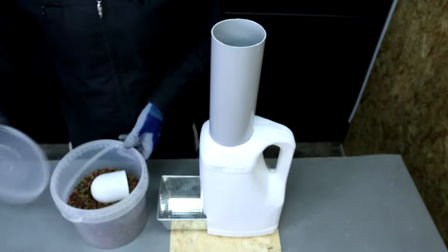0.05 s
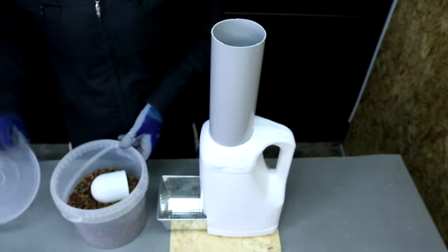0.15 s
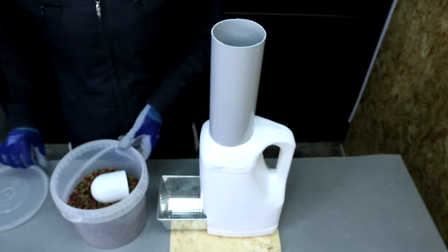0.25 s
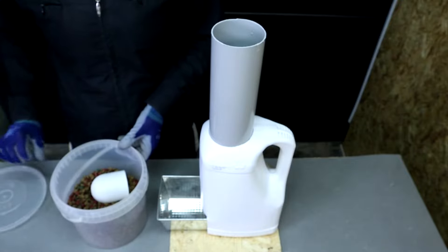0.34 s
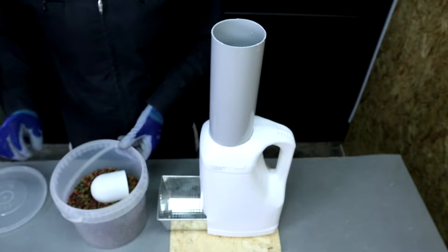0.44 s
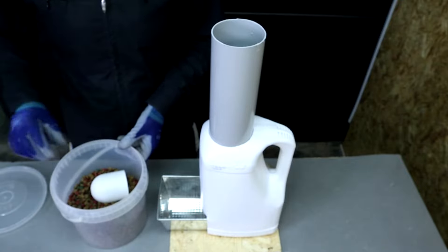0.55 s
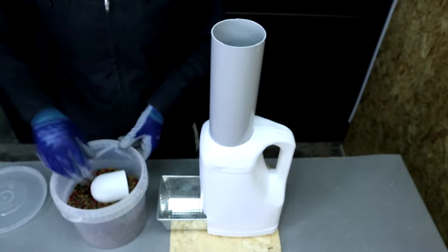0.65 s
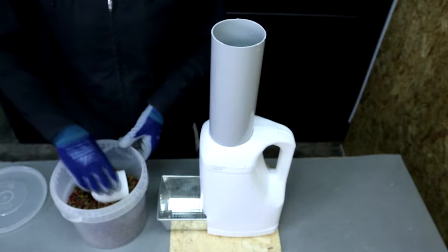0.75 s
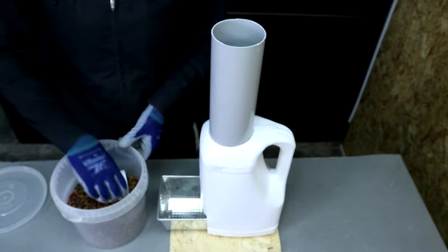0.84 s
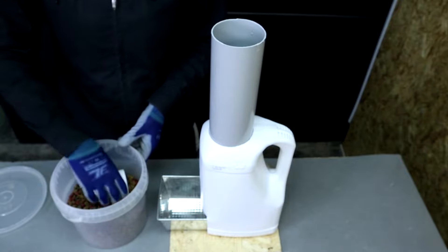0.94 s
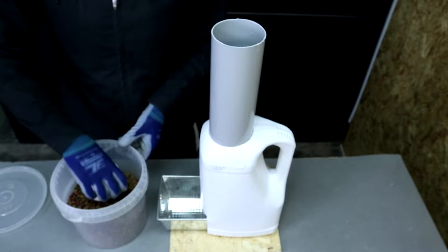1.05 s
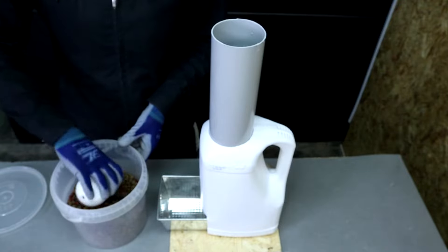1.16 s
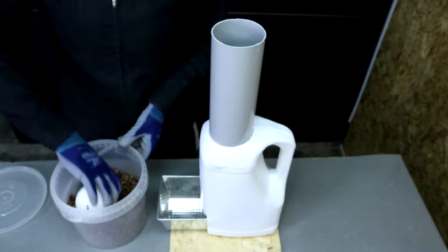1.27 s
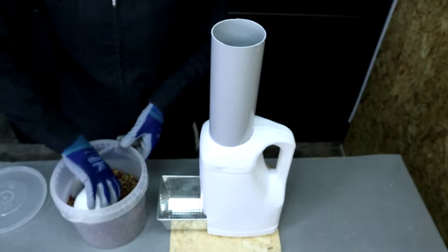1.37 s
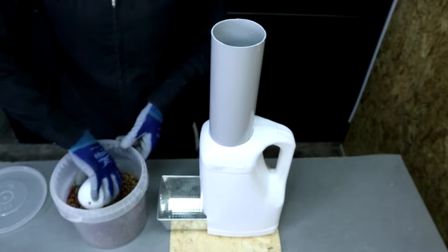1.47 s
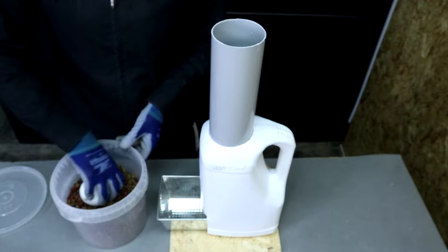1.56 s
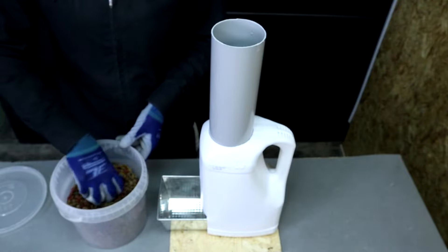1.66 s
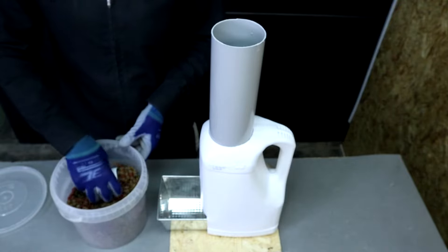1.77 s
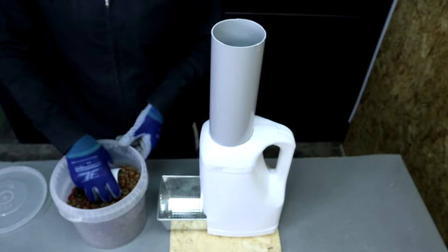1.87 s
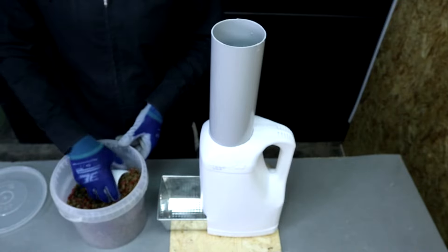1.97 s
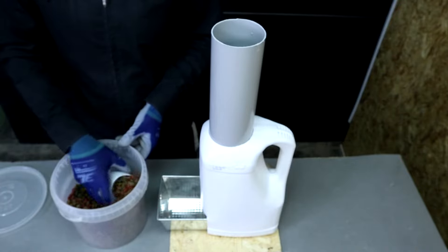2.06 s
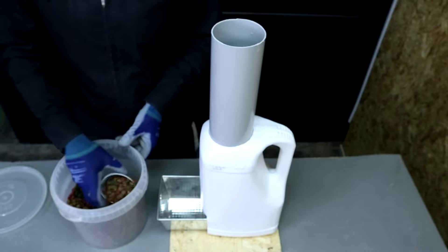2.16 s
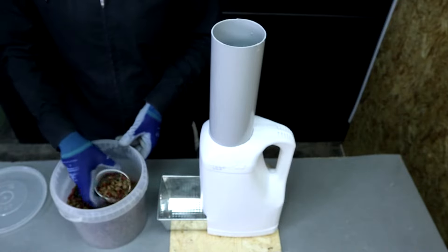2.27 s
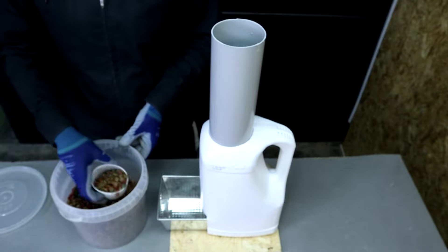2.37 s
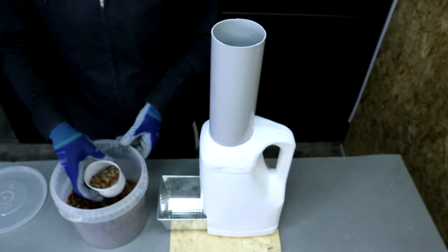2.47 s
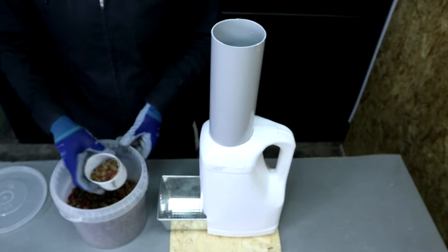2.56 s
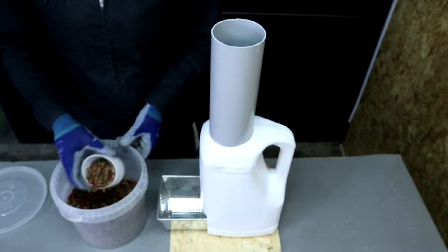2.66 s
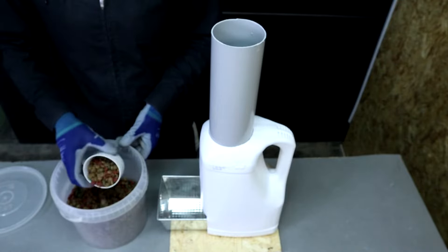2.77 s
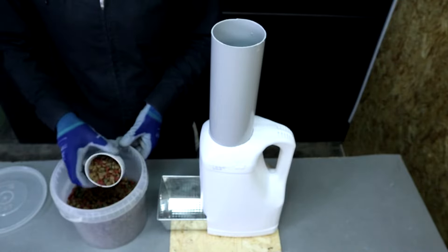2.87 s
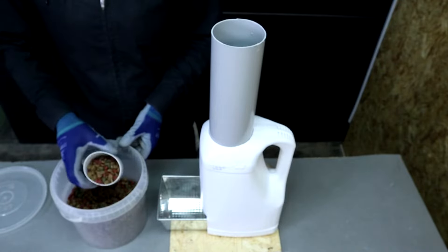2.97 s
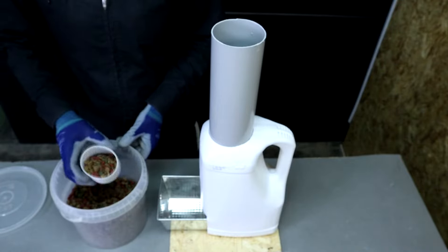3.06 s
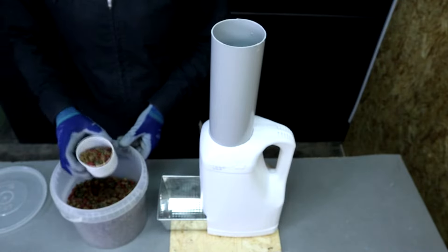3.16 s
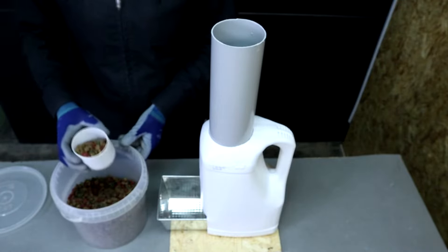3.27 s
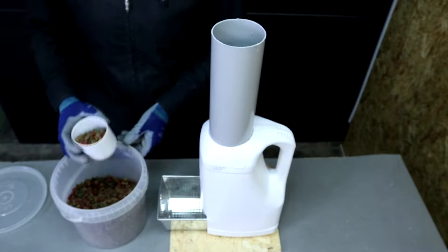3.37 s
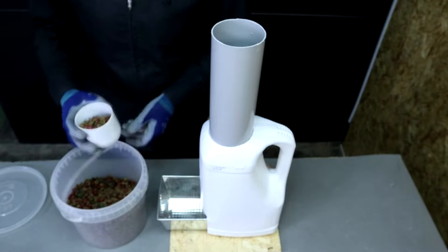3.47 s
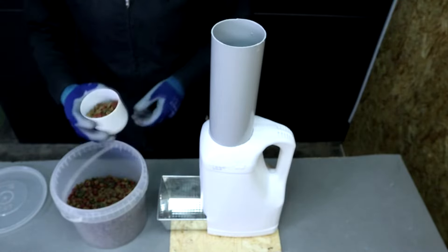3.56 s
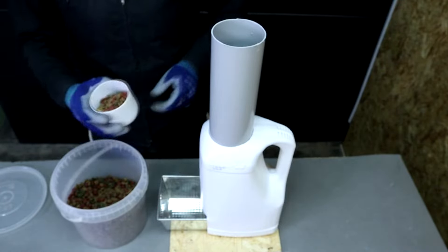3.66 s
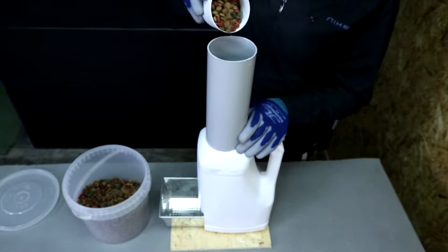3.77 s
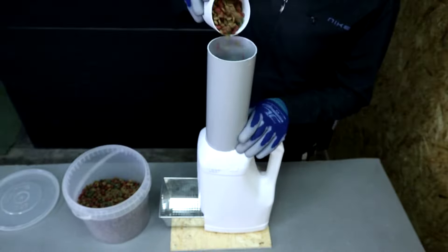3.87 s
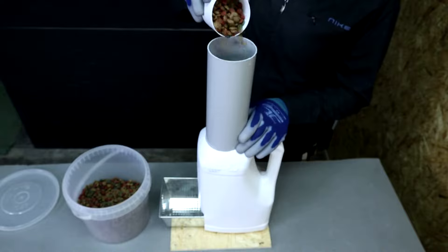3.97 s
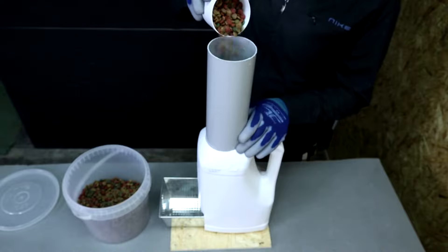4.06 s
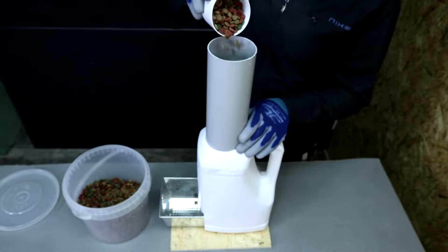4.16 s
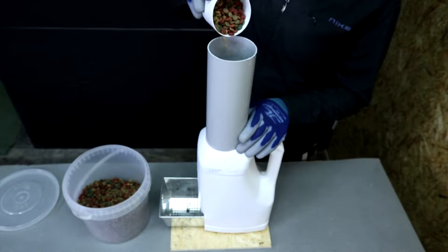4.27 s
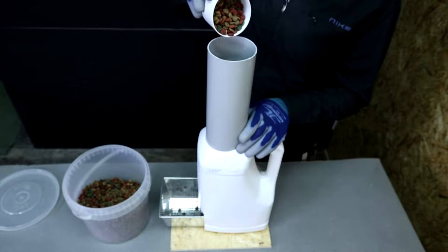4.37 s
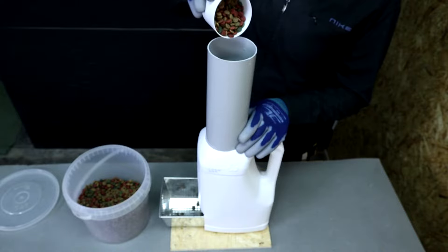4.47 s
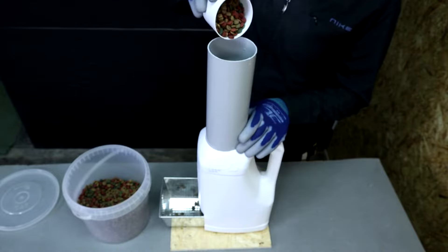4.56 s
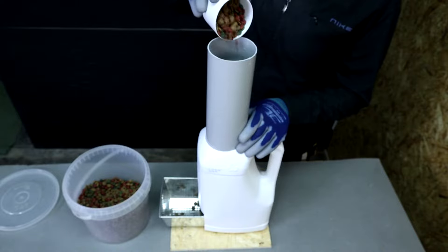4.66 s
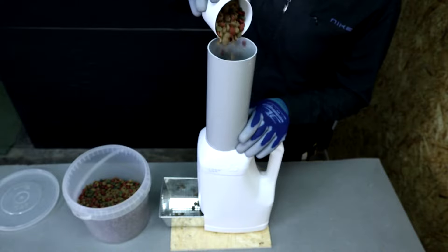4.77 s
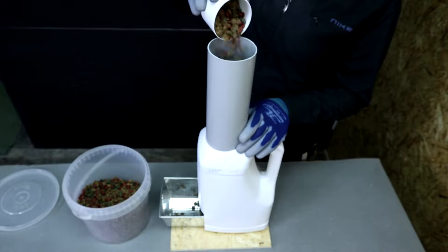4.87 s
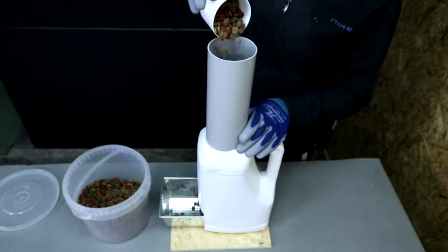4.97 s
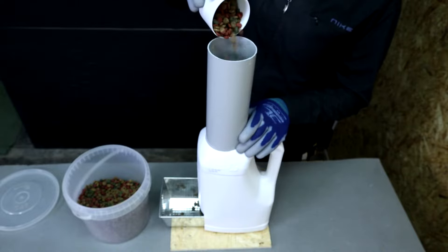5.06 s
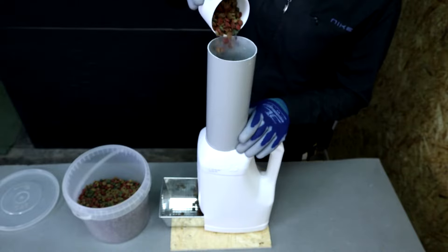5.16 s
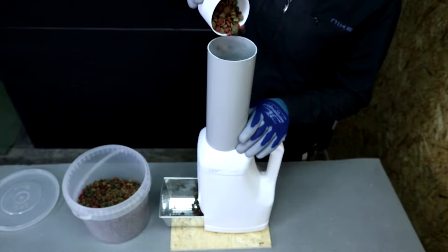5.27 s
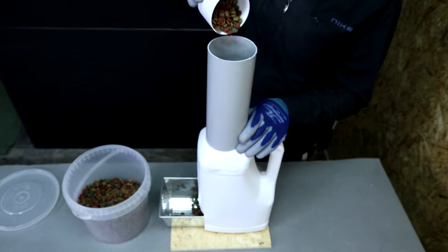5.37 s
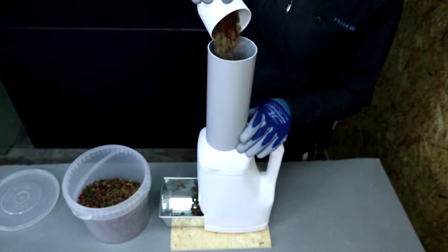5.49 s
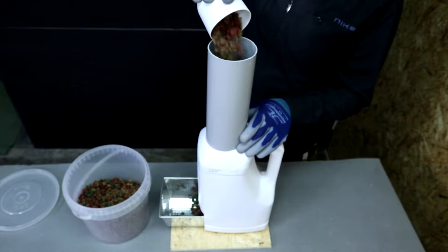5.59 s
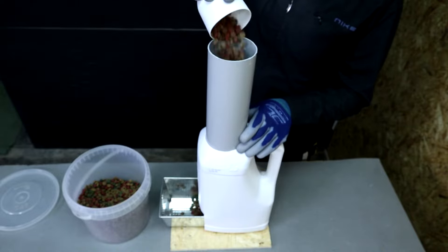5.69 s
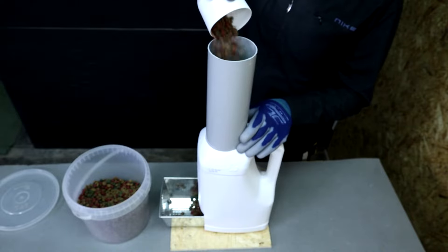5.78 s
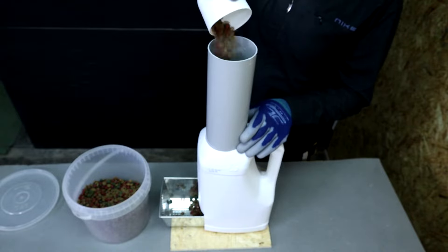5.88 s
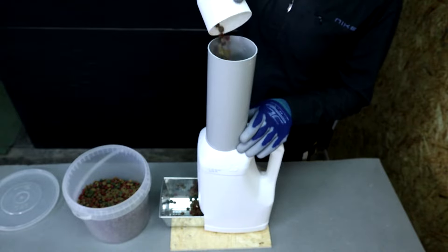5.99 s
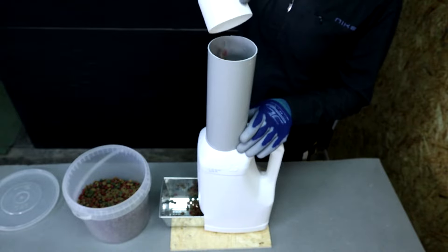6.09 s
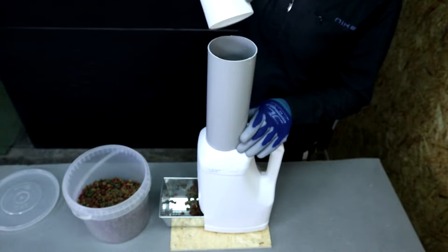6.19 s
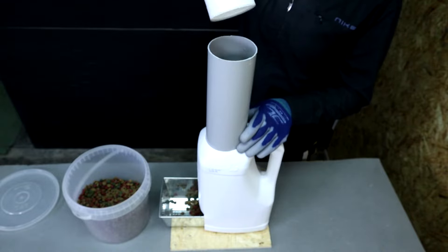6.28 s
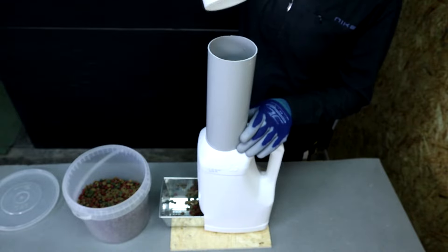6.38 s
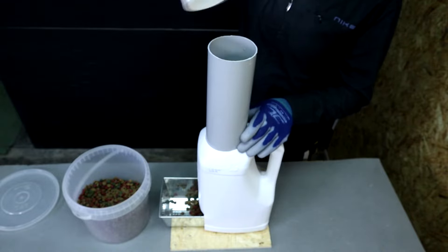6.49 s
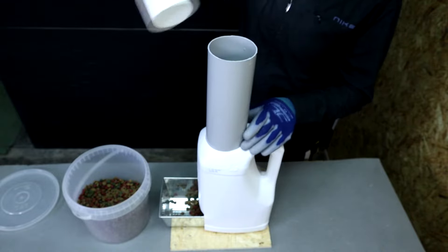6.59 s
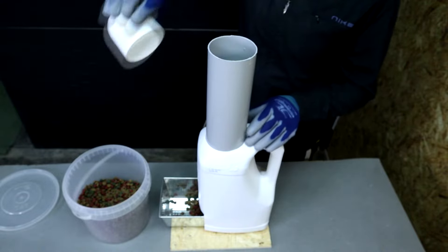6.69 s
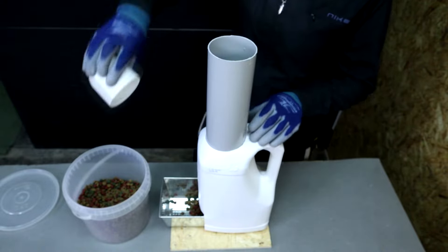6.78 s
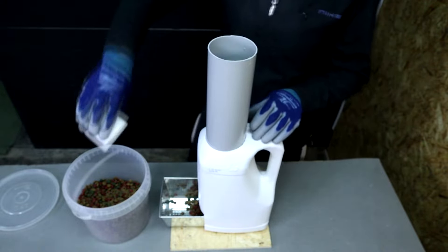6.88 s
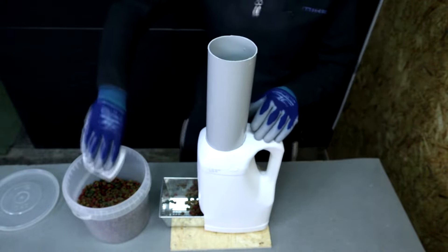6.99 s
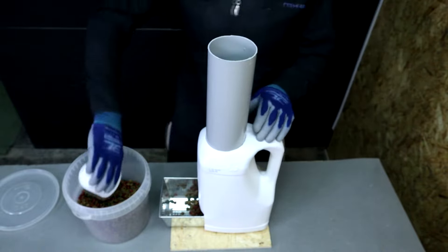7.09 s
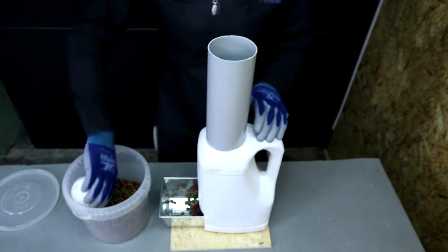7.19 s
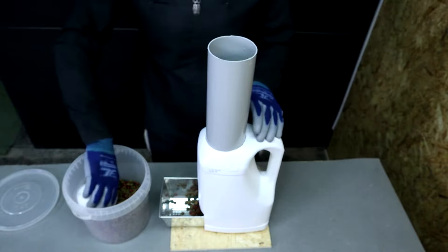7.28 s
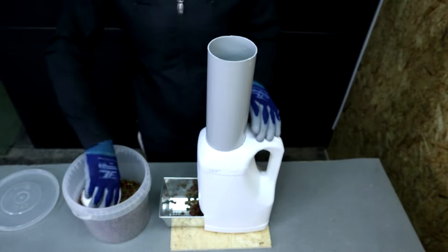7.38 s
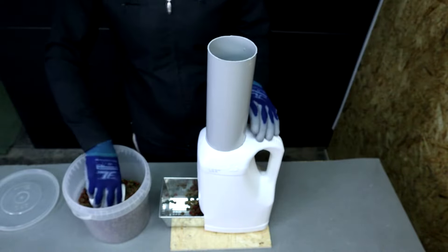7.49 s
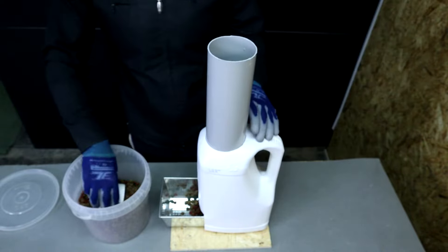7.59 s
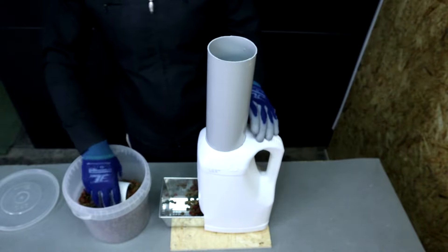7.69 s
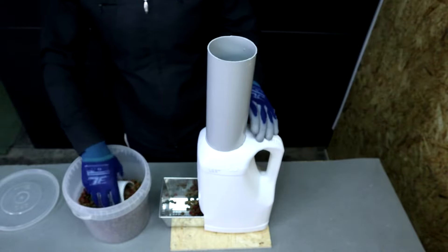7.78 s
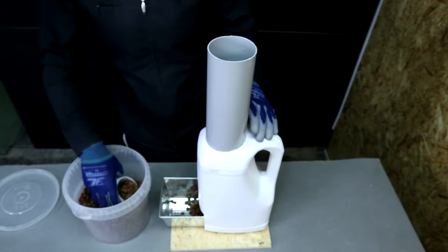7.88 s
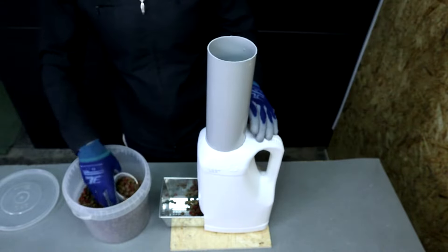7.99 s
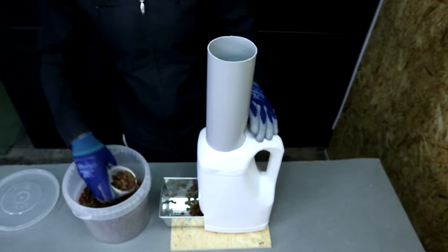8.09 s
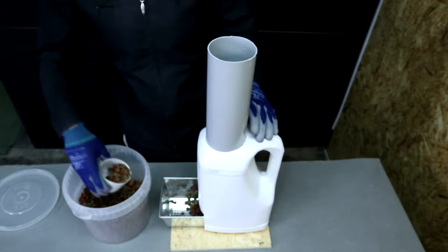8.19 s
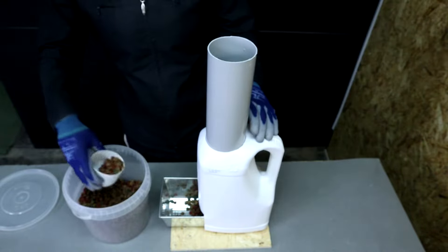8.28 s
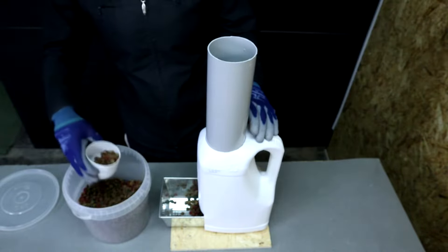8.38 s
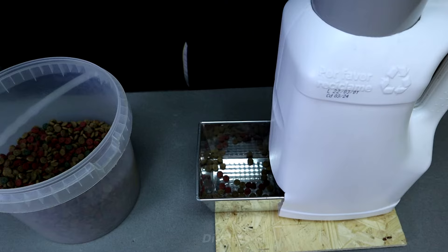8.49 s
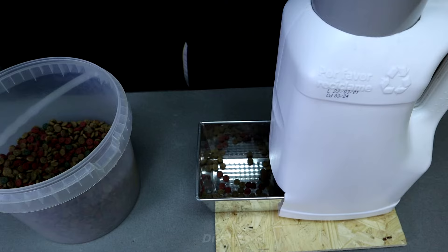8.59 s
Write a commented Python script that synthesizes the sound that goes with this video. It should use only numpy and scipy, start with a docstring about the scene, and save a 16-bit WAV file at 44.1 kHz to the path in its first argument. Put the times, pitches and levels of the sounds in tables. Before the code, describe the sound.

A plastic lid clatters down, a cup crunches through dry pellets in a tub, then loud rattling pours ring a hollow plastic jug over a deep hum.

```python
"""A deep hum fills a small room; a plastic lid knocks on a table, then a cup digs dry pellets out of a plastic
tub and pours them down a pipe into a hollow jug with a metal tray, then digs again; an engine throbs outside.
Pellets are random taps ringing a plastic body; hums are sine waves; cloth and air are shaped noise.
Echoes, and reflections that differ left and right, place the near sounds in front of two microphone ports."""
import sys
import numpy as np
from scipy import signal
from scipy.fft import rfft, irfft, next_fast_len
from scipy.io import wavfile
from scipy.ndimage import uniform_filter1d

SR = 44100
rng = np.random.default_rng(int(sys.argv[2]) if len(sys.argv) > 2 else 0)


def waveform_to_disk(signal):
    """Save audio, clipped to [-1, 1], as 16-bit WAV at the path in sys.argv[1]."""
    frames = np.transpose(np.atleast_2d(signal))
    scaled = np.clip(frames, -1, 1) * 32767
    samples = np.round(scaled).astype(np.int16)
    wavfile.write(sys.argv[1], SR, samples)


N = 381024
T = np.arange(N) / SR
HUM_HZ = 40.6

# Deep hum through the walls. Each row: time in seconds, level in dB before the dips.
HUM = [(0, -43), (1.0, -40.5), (1.8, -38), (3.72, -36.5), (4.06, -45), (5.52, -44), (6.1, -41), (6.4, -48)]
# Engine outside. Each row: time in seconds, firings a second, level in dB.
ENGINE = [(5.6, 11, -47), (6.3, 10.7, -49.5), (6.8, 12.1, -42), (7.05, 13.0, -35.5), (7.3, 13.5, -30),
          (7.65, 13.3, -29), (8.05, 13.3, -27), (8.25, 13.7, -29.5), (8.499, 14.1, -27.5)]
# Tone colour of the plastic tub. Each row: pitch in Hz, level in dB.
TUB = [(50, -7), (200, -17), (400, -10), (1100, -12), (2000, -28.5), (5000, -46)]
# Notes the tub rings at. Each row: pitch in Hz, width in Hz, strength in dB over the colour.
TUB_RINGS = [(150.5, 25, 7.8), (251, 18, 10.5), (349, 36, 12), (406, 30, 19.5), (530, 11, 3.9),
             (637, 11, 10), (796, 140, 6.1), (998, 69, 15.7)]
# Flow of pellets down the pipe, one table a pour. Each row: time in seconds, rattle level in dB.
POURS = [
    [(4.115, -25), (4.25, -24.5), (4.435, -22.5), (4.5, -18.5), (4.645, -23), (4.915, -43), (4.98, -35)],
    [(5.02, -16), (5.135, -17), (5.265, -23.5), (5.475, -20), (5.505, -30)],
    [(5.59, -23.5), (5.645, -31), (5.685, -15), (5.8, -19), (6.03, -31.5), (6.25, -33), (6.365, -39.5),
     (6.5, -57)],
    [(8.51, -44), (8.56, -30), (8.595, -24), (8.64, -32)],
]
# Tone colour of the jug. Each row: pitch in Hz, level in dB.
JUG = [(290, -67), (520, -17), (609, -7), (1060, -8), (1550, -7.5), (3410, -7.5), (11200, -13.5),
       (14600, -30.5)]
# Notes the jug rings at. Each row: pitch in Hz, width in Hz, strength in dB over the colour.
JUG_RINGS = [(608, 50, 5.5), (767, 120, 3), (945, 34, 6), (1302, 64, 9), (1565, 76, 11), (1866, 140, 6.5),
             (2170, 135, 7), (2730, 39, 7), (3200, 220, 4), (3430, 69, 9.5), (3670, 71, 5.5),
             (4100, 350, 2.5), (5150, 260, 2.5), (6730, 73, 2)]


def gain_of(db):
    """Turns decibels into an amplitude factor."""
    return 10 ** (np.asarray(db) / 20)


def evened(x):
    """Scales a signal to an average (RMS) strength of 1."""
    return x / np.sqrt(np.mean(x ** 2) + 1e-20)


def read(points, hz):
    """Reads a (Hz, value) table at any pitch, along a logarithmic pitch axis."""
    f, value = np.transpose(points)
    return np.interp(np.log(hz + 1), np.log(f + 1), value)


def track(tables, column, silent=-120.):
    """One column of one or several tables along time, held at the silent value outside them."""
    out = np.full(N, silent)
    several = np.ndim(tables[0]) == 2
    for rows in tables if several else [tables]:
        rows = np.array(rows, dtype=float)
        on = (T >= rows[0, 0]) & (T <= rows[-1, 0])
        out[on] = np.interp(T[on], rows[:, 0], rows[:, column])
    return out


def body(colour, rings, spread_db=0., tilt_db=0., size=4096):
    """Ring of a struck thing, energy 1; each place struck weights and shifts its notes by chance."""
    hz = np.fft.rfftfreq(size, 1 / SR)
    power = np.ones(len(hz))
    for f, width, db in rings:
        strength = gain_of(db + spread_db * rng.standard_normal())
        shifted = f * (1 + 0.0017 * spread_db * rng.standard_normal())
        power += strength ** 2 / (0.5 + (2 * (hz - shifted) / width) ** 2)
    broad_db = np.maximum(read(colour, hz) + tilt_db * np.log2(hz / 500 + 0.11), -100)
    # folding the log spectrum makes the ring start at once and die away (minimum phase)
    fold = irfft(np.log(gain_of(broad_db) * np.sqrt(power)))
    fold[1:size // 2] *= 2
    fold[size // 2 + 1:] = 0
    ring = irfft(np.exp(rfft(fold)))
    return ring / np.linalg.norm(ring)


def rattle(level_db, colour, rings, per_s, uneven_db, clumpy_db, spread_db, rough=1., count=8, size=1024):
    """Random pellet impacts, a few large, in clumps; the stream wanders between places of the body."""
    force = gain_of(uneven_db * np.minimum(rng.exponential(1, N), 3.5)) * rng.choice([-1., 1.], N)
    clumps = evened(uniform_filter1d(uniform_filter1d(rng.standard_normal(N), 400), 400))
    struck = rng.random(N) < per_s / SR
    blows = evened(force * struck * gain_of(clumpy_db * clumps)) * gain_of(level_db)
    place = np.repeat(rng.integers(0, count, N // size + 1), size)[:N]
    # a rough pellet touches several times within a few ms
    touches = (rng.random((count, 512)) < .06) * rng.standard_normal((count, 512))
    chatter = rough * touches * gain_of(-60 * T[:512] / 0.034)
    chatter[:, 0] = 3.5
    out = np.zeros(N)
    for k, contact in enumerate(chatter):
        hit = np.convolve(contact / np.linalg.norm(contact), body(colour, rings, spread_db))
        out += signal.oaconvolve(blows * (place == k), hit)[:N]
    return out


def burst(db, t60, ring, rise_s, uneven_db=0.):
    """A flurry of bounces that dies away, ringing a body; db is its peak, t60 the time to fall 60 dB."""
    t = np.arange(8192) / SR
    bounces = rng.standard_normal(8192) * gain_of(uneven_db * rng.exponential(1, 8192))
    flurry = bounces * np.minimum(t / rise_s, 1) * gain_of(-60 * t / t60)
    sound = signal.fftconvolve(flurry, ring)[:8192]
    return gain_of(db) * sound / abs(sound).max()


def add(mix, s, sound):
    """Adds a sound into the mix from second s on."""
    part = mix[round(s * SR):][:len(sound)]
    part += sound[:len(part)]


def resonate(x, hz, width):
    """A sliding resonance: shifts the pitch curve hz down to zero, smooths, and shifts back."""
    turn = np.exp(2j * np.pi * np.cumsum(hz) / SR)
    r = np.exp(-np.pi * width / SR)
    return 2 * (turn * signal.lfilter([1 - r], [1, -r], x / turn + 1e-18)).real


def dips():
    """Flat-bottomed dips of the bass under the first two pours, in dB."""
    # Each row: start in seconds, deepest point in seconds, end in seconds, depth in dB.
    dip_rows = [(4.075, 4.55, 4.93, -23), (4.97, 5.3, 5.52, -21)]
    out = np.zeros(N)
    for s, deepest, end, db in dip_rows:
        depth = np.interp(T, [s, deepest, end], [0, 1, 0])
        out += db * np.sin(np.pi / 2 * depth) ** 0.64
    return out


def hum():
    """The steady deep hum is one sine wave, dipping under the first two pours."""
    return np.sqrt(2) * gain_of(track(HUM, 1) + dips()) * np.sin(2 * np.pi * HUM_HZ * T)


def deep_noise():
    """Bass noise beside the hum that dips with it a little; after the hum ends it follows the engine."""
    floor_db, dip_share = -54.5, 0.39
    band = signal.butter(2, [30, 115], "bandpass", fs=SR, output="sos")
    noise = evened(signal.sosfilt(band, rng.standard_normal(N)))
    beside_hum_db = floor_db + dip_share * dips()
    beside_engine_db = np.maximum(track(ENGINE, 2) - 24.0, floor_db)
    return gain_of(np.where(T < HUM[-1][0], beside_hum_db, beside_engine_db)) * noise


def room_note():
    """One low note of the room: a sine wave with a little narrow noise that makes it waver."""
    # Each row: time in seconds, level in dB.
    note_levels = [(4.55, -63), (4.72, -49.5), (4.9, -62.5), (5.6, -61), (6.04, -43.5), (6.4, -67.5),
                   (6.8, -56.5), (7.26, -54), (7.45, -45), (7.65, -51), (8.05, -45), (8.44, -38),
                   (8.5, -40)]
    note_hz = 161.5
    wavering = evened(resonate(rng.standard_normal(N), np.full(N, note_hz), 5.3))
    note = evened(np.sin(2 * np.pi * note_hz * T) + 0.19 * wavering)
    from_start = [(0, note_levels[0][1])] + note_levels
    return gain_of(track(from_start, 1)) * note


def air():
    """Quiet room noise whose colour drifts in patches of time and pitch."""
    # Tone colour of the room noise. Each row: pitch in Hz, level in dB.
    air_colour = [(82, -27), (140, -7.5), (415, -7), (612, -8), (885, -12.5), (1750, -13), (12900, -31),
                  (14500, -30)]
    hz = np.fft.rfftfreq(1024, 1 / SR)
    real, imaginary, patches = rng.standard_normal((N // 256 + 5, 513, 3)).T
    patches = evened(uniform_filter1d(uniform_filter1d(patches, 12, 0), 14, 1))
    z = (real + 1j * imaginary) * gain_of(read(air_colour, hz)[:, None] + 2.4 * patches)
    return gain_of(-53) * evened(signal.istft(z, nperseg=1024, noverlap=768)[1][:N])


def lid():
    """The lid lands, rocks and settles: each knock on the table rings the plastic."""
    # Each row: start in seconds, peak in dB, time to fall 60 dB in seconds,
    # hardness in dB per octave, loudest ring in Hz.
    knocks = [(.027, -16.5, 0.15, 0, 161), (.109, -35.5, 0.24, -1, 420), (0.298, -22.5, 0.28, 0, 280),
              (.322, -20, .09, -2, 397), (.335, -15.5, 0.062, -2, 159), (.36, -23.5, 0.31, 0, 254),
              (.436, -18, 0.17, -0.5, 292), (.466, -21, 0.14, -0.5, 755)]
    # Tone colour of the lid. Each row: pitch in Hz, level in dB.
    lid_colour = [(35, -35), (60, -14), (277, -12.5), (432, -13), (735, -11.5), (12000, -45), (15600, -73)]
    # Notes it rings at. Each row: pitch in Hz, width in Hz, strength in dB over the colour.
    lid_rings = [(150, 14, 10), (276, 26, 11.2), (446, 16, 10), (710, 9, 1.8)]
    out = np.zeros(N)
    for s, db, t60, tilt_db, hz in knocks:
        ring = body(lid_colour, lid_rings + [(hz, 60, 9)], 0.79, tilt_db)
        add(out, s, burst(db, t60, ring, rise_s=0.001))
    return out


def drone():
    """A second deep tone: a sine wave that slowly rises in pitch."""
    # Each row: time in seconds, pitch in Hz, level in dB.
    drone_rows = [(.19, 47.5, -68), (.55, 48.6, -40), (.8, 49.5, -43), (1.1, 51, -48), (1.4, 54, -57),
                  (2.4, 57, -51), (3.8, 59, -52), (4.15, 60, -66)]
    turns = np.cumsum(track(drone_rows, 1, 0.)) / SR
    return np.sqrt(2) * gain_of(track(drone_rows, 2)) * np.sin(2 * np.pi * turns)


def sleeve():
    """A sleeve brushes the jacket: cloth hiss in a band that slides, swelling and fading."""
    # Each row: start in seconds, end in seconds, level in dB,
    # centre at the start in Hz, centre at the end in Hz, width in Hz.
    swishes = [(0.646, 0.746, -44.5, 8360, 8450, 8100), (0.655, 0.744, -50, 3100, 3000, 500),
               (0.873, 0.997, -53, 4150, 2680, 500), (2.473, 2.61, -60.5, 3610, 4000, 1200),
               (3.116, 3.293, -50, 4100, 2730, 900), (3.696, 3.8, -49.5, 3600, 3980, 1100),
               (6.98, 7.262, -52, 4100, 1260, 900)]
    out = np.zeros(N)
    for s, end, db, from_hz, to_hz, width in swishes:
        hz = np.linspace(from_hz, to_hz, round((end - s) * SR))
        noise = rng.standard_normal(len(hz))
        hiss = resonate(resonate(noise, hz, width), hz, width)
        add(out, s, gain_of(db) * evened(hiss) * signal.windows.tukey(len(hz), .7))
    return out


def shoves(column):
    """Level in dB of all shoves of cup and glove together, each climbing to its peak and sinking."""
    # Each row: peak in seconds, rise in seconds, fall in seconds,
    # crunch level in dB, push on the tub walls in dB.
    pushes = [(0.99, 0.053, 0.23, -52.5, -50), (1.075, 0.11, 0.17, -48.5, -45.5),
              (1.275, 0.24, 0.13, -50, -42.5), (1.38, 0.035, 0.78, -44, -39.5),
              (1.568, 0.14, 0.052, -25.5, -20.5), (1.663, 0.14, 0.052, -23, -21.5),
              (1.819, 0.45, 0.071, -30.5, -28.5), (1.975, 0.18, 0.66, -33, -34), (2.3, 0.34, 0.2, -26, -49),
              (2.79, 0.16, 0.15, -46, -50.5), (2.88, 0.038, 0.12, -43, -50),
              (3.645, 0.049, 0.18, -49, -43.5), (3.875, 0.12, 0.2, -49, -58), (4.0, 0.038, 0.18, -37, -51),
              (4.1, 0.053, 0.034, -40, -46), (7.289, 0.016, 0.14, -30, -27),
              (7.41, 0.11, 0.067, -28.5, -21), (7.518, 0.07, 0.092, -30.5, -21),
              (7.733, 0.08, 0.093, -31, -22), (7.915, 0.16, 0.13, -37.5, -35), (8.08, 0.65, 0.18, -43, -43),
              (8.17, 0.13, 0.35, -50.5, -37.5), (8.42, 0.14, 0.44, -43.5, -41)]
    span_db = 20  # a shove climbs this far in its rise time and sinks this far in its fall time
    t = T[::64]
    each = []
    for row in pushes:
        away = np.maximum((row[0] - t) / row[1], (t - row[0]) / row[2])
        each.append(row[column] - span_db * away)
    return np.interp(T, t, 10 * np.log10((gain_of(each) ** 2).sum(0) + 1e-12))


def crunch():
    """Shoved pellets crunch against each other, coloured by the hollow of the cup."""
    # Tone colour of the crunch. Each row: pitch in Hz, level in dB.
    crunch_colour = [(530, -33.5), (900, -2.5), (1350, -2.5), (1900, -1.5), (2800, -1.5), (5300, -8.5),
                     (9500, -20), (12000, -31.5), (14000, -70)]
    # The cup's hollow, higher as it fills. Each row: time in seconds, pitch in Hz.
    cup_pitch = [(2.1, 1920), (2.3, 2600), (3.0, 2620), (7.2, 1850)]
    out = rattle(shoves(column=3), crunch_colour, [], per_s=3200, uneven_db=2.0, clumpy_db=1.77,
                 spread_db=0., rough=0.52)
    hollow_hz = np.interp(T, *np.transpose(cup_pitch))
    return out + gain_of(-2) * resonate(out, hollow_hz, width=600)


def tub_drumming():
    """Shoved pellets drum on the walls of the tub and ring them."""
    return rattle(shoves(column=4), TUB, TUB_RINGS, per_s=1600, uneven_db=2.0, clumpy_db=0.5,
                  spread_db=-0.2, rough=0.31)


def ticks():
    """Single pellets tick on cup, rim and tub, each a short burst around its own pitch."""
    # Each row: start in seconds, peak in dB, pitch in Hz.
    tick_rows = [(0.9857, -32, 3750), (1.3615, -24, 3500), (1.465, -21, 2000), (1.658, -16, 2140),
                 (2.232, -26, 7500), (2.3127, -16, 2503), (2.649, -31.5, 4100), (2.782, -25.5, 3370),
                 (2.874, -16, 2700), (3.95, -21, 7040), (3.997, -15.5, 5760), (4.015, -16, 6340),
                 (4.045, -18.5, 6900), (4.853, -20.5, 7300), (4.886, -23, 6500), (4.9394, -23, 3920),
                 (4.976, -16.5, 6170), (5.0028, -14, 2700), (7.269, -26, 2000), (7.925, -32, 2400),
                 (8.036, -25.5, 6440), (8.104, -27, 2580), (8.187, -23, 5340), (8.2988, -18.5, 2880),
                 (8.428, -20.5, 7000), (8.4577, -23, 7000)]
    out = np.zeros(N)
    for s, db, hz in tick_rows:
        colour = [(hz / 8, -30), (hz / 2.7, -8), (hz, 0), (hz * 1.41, -7), (hz * 4, -24)]
        ring = body(colour, [(hz, 900, 3), (1.74 * hz, 900, 2)])
        add(out, s, burst(db, 0.037, ring, rise_s=0.00011))
    return out


def bumps():
    """The cup bumps the tub wall, which rings briefly."""
    # Each row: start in seconds, peak in dB, time to fall 60 dB in seconds.
    bump_rows = [(1.541, -12.5, 0.06), (1.572, -14.5, 0.095), (7.495, -11, 0.052), (7.529, -19, 0.12),
                 (7.695, -20, 0.043), (7.715, -19, 0.078)]
    out = np.zeros(N)
    for s, db, t60 in bump_rows:
        ring = body(TUB, TUB_RINGS, spread_db=2.0, tilt_db=0.7)
        add(out, s, burst(db, t60, ring, rise_s=0.004))
    return out


def clumps_landing():
    """Clumps of pellets land together in the jug: dense flurries of bounces that ring it."""
    # Each row: start in seconds, peak in dB, time to fall 60 dB in seconds.
    clump_rows = [(4.113, 1, 0.026), (4.119, 0, 0.025), (4.155, 0.5, 0.2), (4.183, -3, 0.25),
                  (4.256, -6, 0.26), (4.292, -10, 0.052), (4.338, -9.5, 0.35), (4.379, -5.5, 0.046),
                  (4.442, -4, 0.25), (4.542, -10, 0.079), (4.62, -12, 0.069), (4.569, -5, 0.03),
                  (5.02, -5, 0.076), (5.049, -2, 0.052), (5.078, -18, 0.04), (5.108, -6.5, 0.48),
                  (5.213, -12.5, 0.06), (5.28, -11, 0.094), (5.297, -7, 0.068), (5.346, -1, 0.065),
                  (5.44, -7.5, 0.13), (5.474, -4.5, 0.051), (5.592, -9, 0.03), (5.663, -5.5, 0.21),
                  (5.738, -22, 0.21), (8.513, -11.5, 0.021), (8.539, 4.5, 0.044), (8.564, -18, 0.11),
                  (8.591, 4.5, 0.035)]
    closer_s, closer_tilt_db = 8.5, 1.5  # heard closer from here: brighter (dB per octave), no jug ring
    out = np.zeros(N)
    for s, db, t60 in clump_rows:
        if s > closer_s:
            ring = body(JUG, [], spread_db=3.0, tilt_db=closer_tilt_db)
        else:
            ring = body(JUG, JUG_RINGS, spread_db=3.0)
        add(out, s, burst(db, t60, ring, rise_s=0.022 * t60, uneven_db=1.5))
    return out


def pour_rattle():
    """Poured pellets rattle on pipe and jug, following the flow."""
    return rattle(track(POURS, 1), JUG, JUG_RINGS, per_s=2600, uneven_db=1.5, clumpy_db=3.5,
                  spread_db=2.0, rough=0.61, count=12)


def boom_level(ring):
    """Level in dB of one ring of the boom: it follows the flow sluggishly, lifted as a pour begins."""
    # One row a pour: low, middle and high ring, each in dB over the rattle before start lift and fade.
    over_rattle = [(-21, -6.5, -24), (-19.5, -13, -25), (-20.5, -25, -13), (-2.5, -16, -25)]
    # Drift as the jug fills: low, middle and high ring, each in dB per second.
    fade = (0, -8, 2)
    start_db, settle_s, smooth_s = 3, 0.05, 0.09
    out = np.full(N, -120.)
    for rows, db in zip(POURS, over_rattle):
        on = (T >= rows[0][0]) & (T <= rows[-1][0])
        since = T[on] - rows[0][0]
        flow = uniform_filter1d(track(rows, 1)[on], round(smooth_s * SR))
        out[on] = flow + db[ring] + fade[ring] * since + start_db * np.exp(-since / settle_s)
    return out


def jug_boom():
    """The air in pipe and jug booms at three low pitches, kept ringing evenly by the stream."""
    # Tone colour of the boom. Each row: pitch in Hz, level in dB.
    boom_colour = [(150, -69), (260, -8), (410, -7.5), (500, -21.5), (620, -22), (800, -58)]
    # Low, middle and high ring. Each row: pitch in Hz, width in Hz, strength in dB over the colour.
    boom_rings = [(305.5, 34, 17), (388, 26, 32), (606, 45, 36)]
    out = np.zeros(N)
    for k, ring in enumerate(boom_rings):
        hollow = rattle(0, boom_colour, [ring], per_s=2500, uneven_db=2.5, clumpy_db=0.,
                        spread_db=0.4, rough=0.21)
        swell = np.sqrt(abs(uniform_filter1d(hollow ** 2, size=1024)) + .05)
        out += gain_of(boom_level(k)) * hollow / swell
    return out


def engine():
    """A throbbing engine: multiples of its firing rate, stronger near the pitch of the hum."""
    # Each row: multiple of the firing rate, level in dB before lift and waver.
    orders_db = [(2, -28), (3, 8), (4, 5), (5, -5), (6, -8.5), (7, -11)]
    rate = track(ENGINE, 1, ENGINE[0][1])
    turns = np.cumsum(rate) / SR
    turns -= np.interp(7.807, T, turns)  # one firing lands here
    waver = evened(uniform_filter1d(rng.standard_normal((len(orders_db), N)), 6000))
    out, power = np.zeros(N), np.zeros(N)
    for (k, db), w in zip(orders_db, waver):
        lift = 1 + 1.8 / (1 + ((k * rate - HUM_HZ) / 1.44) ** 2)
        # each order drifts a little in level and phase
        out += lift * gain_of(db + 3.4 * w) * np.cos(2 * np.pi * k * turns + 0.37 * w[::-1])
        power += (lift * gain_of(db)) ** 2 / 2
    return gain_of(track(ENGINE, 2)) * out / np.sqrt(power)


def tray_skitter():
    """The last pellets skitter out into the metal tray as sparse, bright, uneven taps."""
    # Each row: time in seconds, level in dB.
    skitter_levels = [(5.8, -58), (6.0, -32.5), (6.25, -36.5), (6.4, -45.5), (6.47, -90)]
    # Tone colour of the tray. Each row: pitch in Hz, level in dB.
    tray_colour = [(2000, -38), (4500, -2.5), (9000, -5), (14500, -13.5)]
    return rattle(track(skitter_levels, 1), tray_colour, [(6900, 200, 5)], per_s=900, uneven_db=3.5,
                  clumpy_db=2.2, spread_db=2.5)


def trickle():
    """Loose pellets trickle off the lifted cup: few taps, strongly clumped."""
    # Each row: time in seconds, level in dB.
    trickle_levels = [(7.9, -61), (8.02, -63), (8.25, -41.5), (8.5, -45)]
    # Tone colour of the loose pellets. Each row: pitch in Hz, level in dB.
    loose_colour = [(1500, -25), (4000, 0.5), (7500, 0), (10500, -7), (14500, -32)]
    return rattle(track(trickle_levels, 1), loose_colour, [], per_s=130, uneven_db=1.5, clumpy_db=7.0,
                  spread_db=0.)


def echoes(shrink):
    """Sparse taps of random sign, each band dying at its own speed, energy 1."""
    # Each row: pitch in Hz, time to fall 60 dB in seconds before shrinking.
    room_decay = [(200, 0.42), (1000, 0.33), (4000, 0.32), (12000, 0.31)]
    taps = np.zeros(SR // 2)
    at = np.arange(0, SR // 2 - 20, 20)
    taps[at + rng.integers(0, 20, len(at))] = rng.choice([-1., 1.], len(at))
    hz, t, z = signal.stft(taps, SR, nperseg=64)
    decay = gain_of(-60 * t / (shrink * read(room_decay, hz))[:, None])
    tail = signal.istft(z * decay, SR, nperseg=64)[1]
    return tail / np.linalg.norm(tail)


def scatter(x, make, per_s, count=3):
    """Sound from shifting places: the sound moves in turn between sets of reflections."""
    turn = np.pi * per_s * T
    out = np.zeros(N)
    for k in range(count):
        share = np.sqrt(2 / count) * np.cos(turn + np.pi * k / count)
        out += signal.oaconvolve(x * share, make())[:N]
    return out


def scene():
    """Mid: direct sound and room. Side: near reflections and another room tail, strong in the treble."""
    # Difference between the ports. Each row: pitch in Hz, side over mid in dB.
    side_colour = [(60, -39), (180, -19), (400, -20), (900, -11.5), (2000, -4), (5000, -0.5), (14000, 4)]
    # The near sounds and their echo drop for a moment: start in seconds, end in seconds.
    hush_from, hush_to = (5.497, 5.59)
    near = lid() + sleeve() + crunch() + tub_drumming() + ticks() + bumps()
    near += clumps_landing() + pour_rattle() + jug_boom() + tray_skitter() + trickle()
    wet = gain_of(-5.0)
    hush_at = [hush_from, hush_from + .018, hush_to - .008, hush_to + .008]
    heard = (1 - np.interp(T, hush_at, [0, .93, .9, 0])) / np.sqrt(1 + wet ** 2)
    mid = heard * (near + wet * scatter(near, lambda: echoes(0.88), per_s=3.1))
    side = heard * scatter(near, lambda: echoes(0.12) + wet * echoes(1), per_s=6) + air()
    # the left port is nearer: it leads and the right lags by lead_s each, plain below lead_hz
    lead_s, lead_hz = 3e-5, 1800
    size = next_fast_len(N)
    hz = np.fft.rfftfreq(size, 1 / SR)
    lead = 2j * np.pi * hz * lead_s / (1 + (hz / lead_hz) ** 2)
    side = irfft(rfft(side, size) * gain_of(read(side_colour, hz)) + rfft(mid, size) * lead, size)[:N]
    ports = np.array([mid + side, mid - side]) * gain_of([[-.3], [.3]])
    rumble = hum() + deep_noise() + room_note() + drone() + engine()
    return ports + air() + rumble


def record(dry):
    """Soft overload rounds off the loudest peaks, then a filter removes the top treble."""
    held = np.tanh(dry / .92) * .92
    low_pass = signal.firwin(255, 14800, window=("kaiser", 9), fs=SR)  # edge in Hz
    return signal.oaconvolve(held, low_pass[None], "same")


dry = scene()
out = record(dry)
waveform_to_disk(out)
```